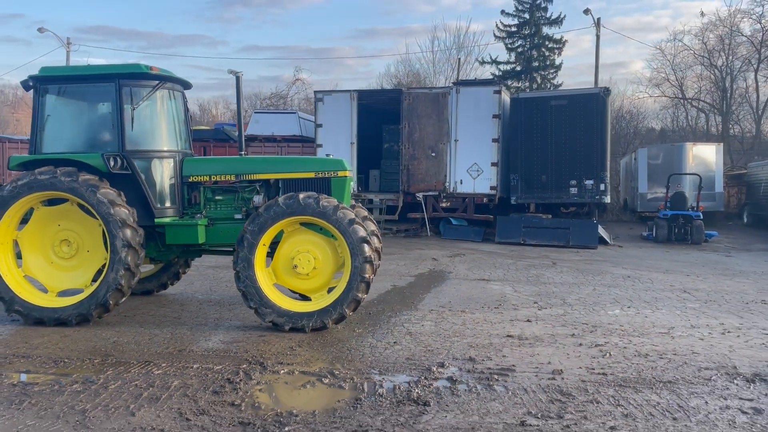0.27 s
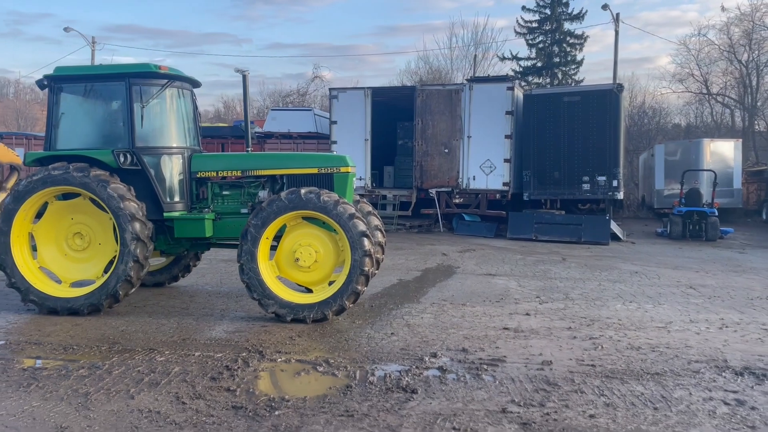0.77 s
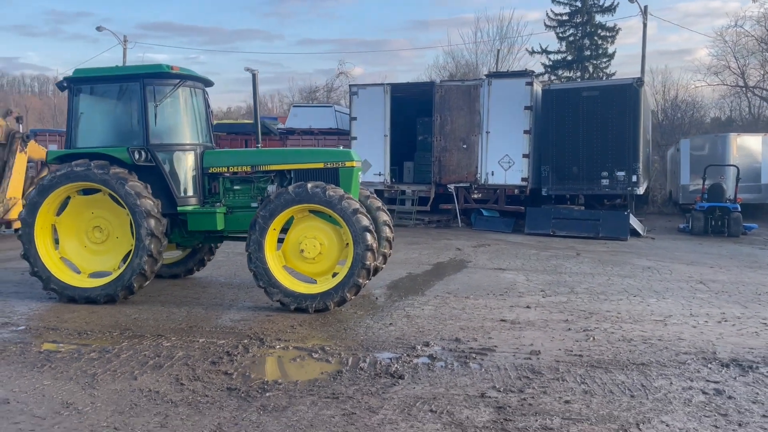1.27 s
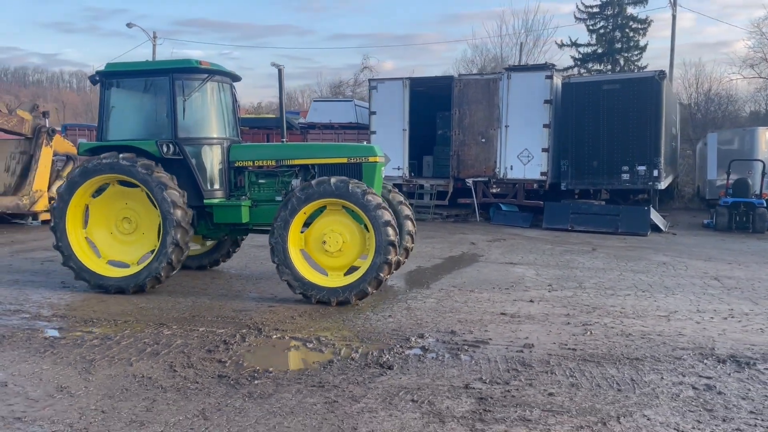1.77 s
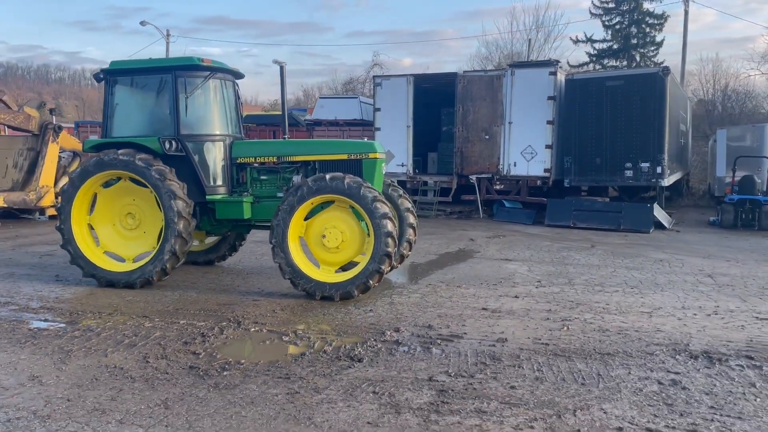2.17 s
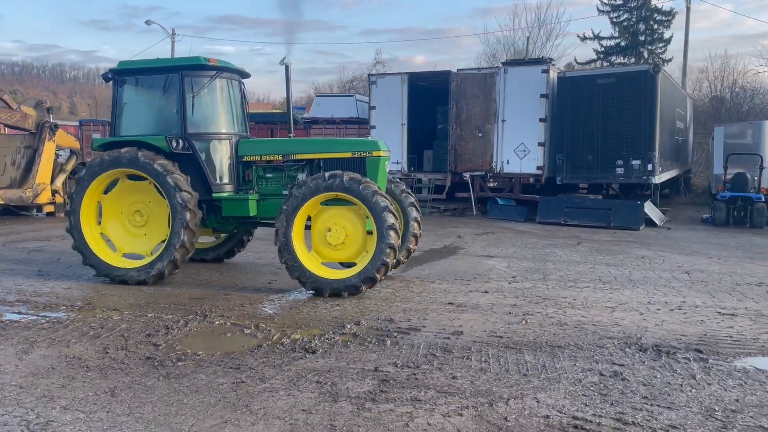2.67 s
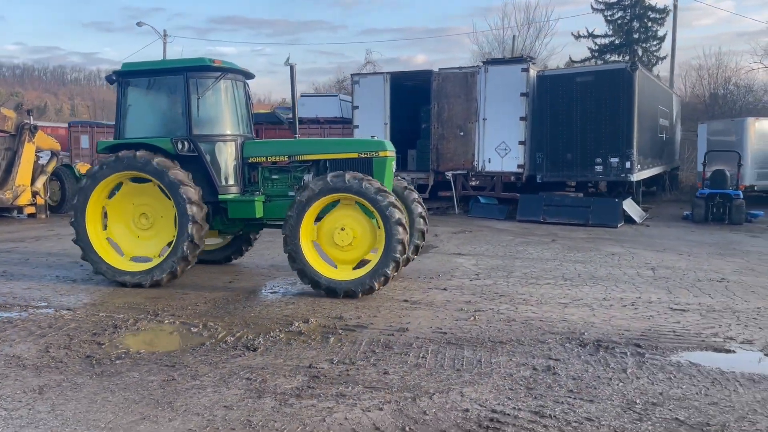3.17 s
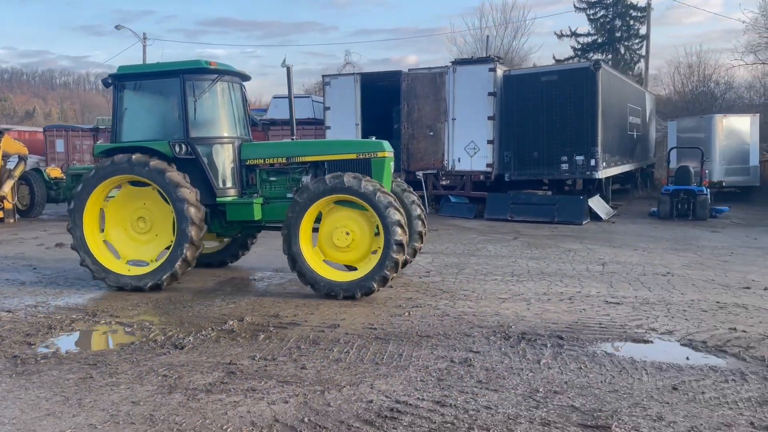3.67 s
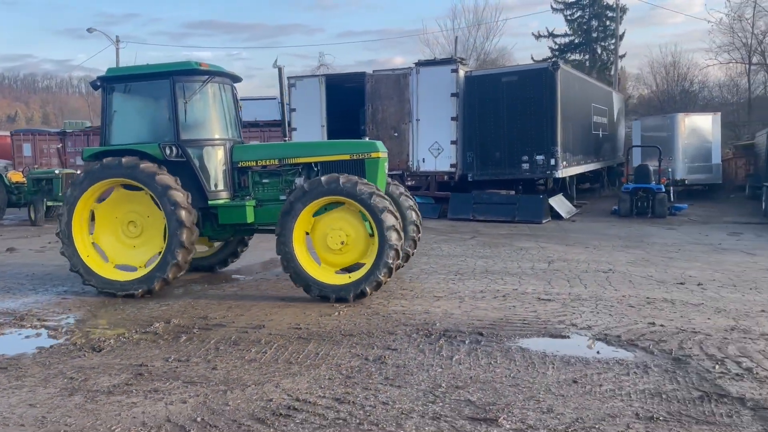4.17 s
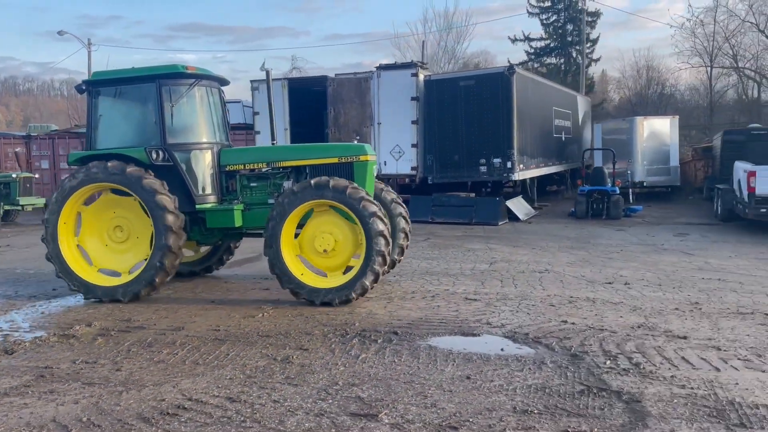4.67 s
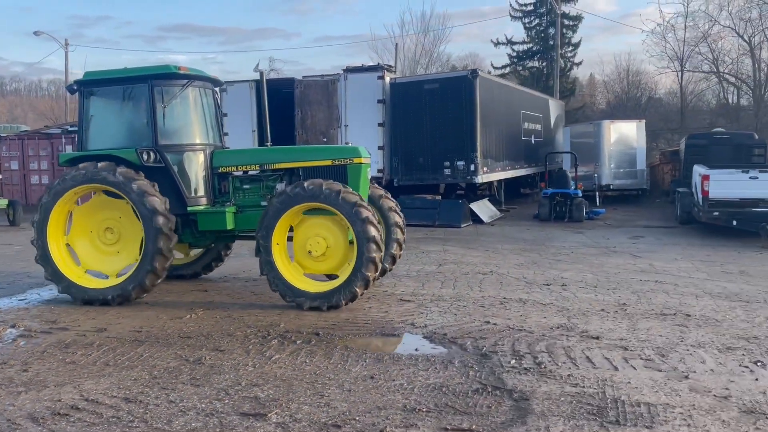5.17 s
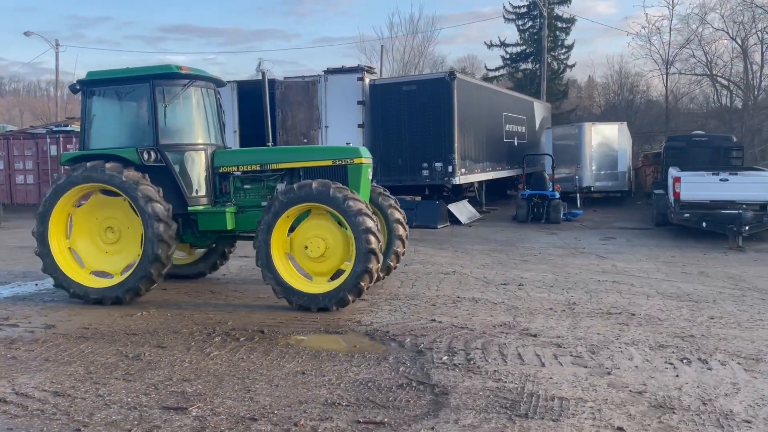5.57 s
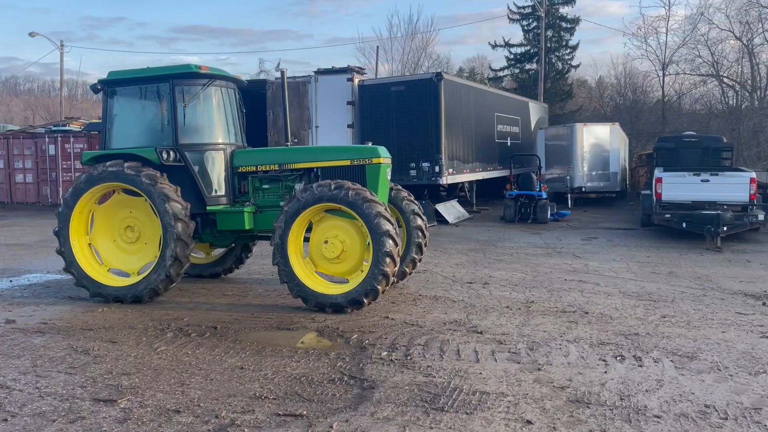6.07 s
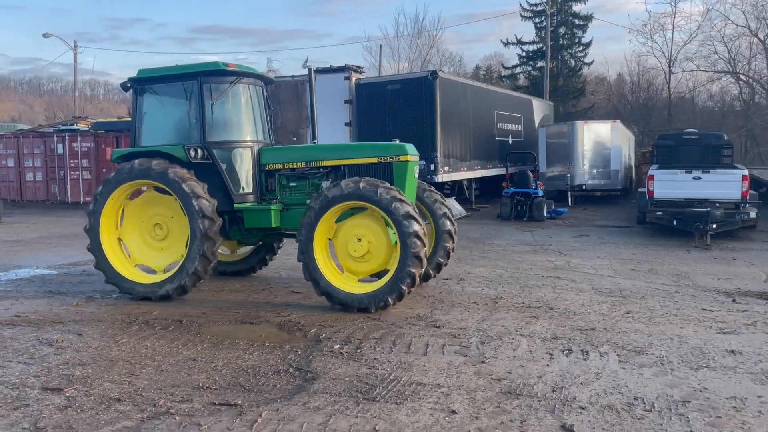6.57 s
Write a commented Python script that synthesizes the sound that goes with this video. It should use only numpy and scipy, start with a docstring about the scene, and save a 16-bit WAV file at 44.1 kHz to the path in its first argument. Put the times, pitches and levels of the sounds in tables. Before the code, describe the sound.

A large diesel tractor idles with clattering knock outdoors, a dull clunk and latch snap, then it revs to a loud steady roar.

```python
"""A six-cylinder diesel tractor idles in an open yard, then is revved up and held at full speed.
Exhaust orders are sines on the four-stroke cycle; knock, thuds and valve-gear clatter are contacts ringing resonances.
Shaped noise gives sump rumble and an injector hiss that pulses with the cycle; a drone catches up late.
A drive engages with a clunk and bouncing latch clacks: decaying modes.
A hand-held pair of microphone ports moves round the machine: phase lead and colour change with bearing."""
import sys
import numpy as np
from scipy import signal
from scipy.fft import rfft, irfft, next_fast_len
from scipy.io import wavfile
from scipy.ndimage import uniform_filter1d

SR = 44100
rng = np.random.default_rng(int(sys.argv[2]) if len(sys.argv) > 2 else 0)


def gain_from_db(level_db):
    """Turn a decibel level (scalar or array-like) into a linear amplitude factor."""
    decades = np.asarray(level_db, float) / 20
    return 10 ** decades


def materialize(psi):
    """Save the field psi as 16-bit PCM at rate SR to the path in sys.argv[1].

    A 1-D psi becomes a single channel; in a 2-D psi each row is a channel.
    """
    bounded = np.clip(np.atleast_2d(psi).T, -1, 1)
    quanta = np.round(bounded * 32767).astype(np.int16)
    wavfile.write(sys.argv[1], SR, quanta)


N = 301644
T = np.arange(N) / SR

# Cylinders in firing order, relative levels: (idle knock [dB], idle knock at later bearing [dB],
# knock at speed [dB], block thud [dB], injector tick [dB])
CYLINDER_LEVELS = [(-16, -9, -7, -8, -3), (-14, -7, -9, 0, -6), (0, -5, -2.5, -5, -2), (-7, -8, -9, -4, 0),
                   (-9, -3, -3, -9, -4), (-13, -4, -9, -8, 0)]
# Place in the cycle: (time [s], third cylinder's knock [cycle turns], fourth cylinder's tick [cycle turns])
EVENT_LAG = [(0, 0.33, 0.45), (1.2, 0.32, 0.45), (2.2, 0.37, 0.85), (2.9, 0.5, 0.26), (3.6, .47, 0.432),
             (6.84, 0.48, 0.27)]


def unit(x):
    """Scales to rms 1."""
    return x / np.sqrt(np.mean(x ** 2) + 1e-20)


def evened(x):
    """Evens loudness over a third of a second."""
    return x / np.sqrt(uniform_filter1d(x ** 2, SR // 3) + 1e-20)


def in_time(rows):
    """Columns of a table as curves over time."""
    s, *columns = np.transpose(rows)
    return [np.interp(T, s, c) for c in columns]


def at_hz(points, hz):
    """A spectrum table read on a log axis."""
    table_hz, table_db = np.array(points)[:, :2].T
    return np.interp(np.log(hz + 1), np.log(table_hz + 1), table_db)


def drift(rate_hz):
    """Slow random curve, rms 1, with two new values per 1/rate_hz."""
    steps = np.arange(0, T[-1] + 1, .5 / rate_hz)
    return unit(np.interp(T, steps, rng.standard_normal(len(steps))))


def noise(colour):
    """Noise of a given spectrum, rms 1."""
    spectrum = rfft(rng.standard_normal(N))
    return unit(irfft(spectrum * gain_from_db(at_hz(colour, np.fft.rfftfreq(N, 1 / SR))), N))


def resonance(x, hz, width_hz):
    """Two-pole resonance with zeros at DC and Nyquist."""
    r = np.exp(-np.pi * width_hz / SR)
    return signal.lfilter([1 - r, 0, r - 1], [1, -2 * r * np.cos(2 * np.pi * hz / SR), r * r], x)


def body(x, modes, view):
    """Parallel resonances, signs alternating; view moves through their level columns."""
    out = 0
    for k, (hz, width_hz, *levels_db) in enumerate(modes):
        share = gain_from_db(np.interp(view, range(len(levels_db)), levels_db))
        out = out + (-1) ** k * share * resonance(x, hz, width_hz)
    return evened(out)


def crank_rpm():
    """Crank speed: idle, a dip, then the climb to full speed."""
    rpm_curve = [(0.0, 711), (0.75, 721), (1.0, 717), (1.3, 667), (1.6, 653), (1.95, 670), (2.1, 670),
                 (2.2, 720), (2.3, 847), (2.4, 1060), (2.7, 1533), (3.0, 1846), (3.4, 2021), (3.8, 2112),
                 (4.28, 2132), (5.4, 2148), (5.96, 2151), (6.24, 2139), (6.8, 2110)]  # (time [s], crank speed [rpm])
    return in_time(rpm_curve)[0]


def stage():
    """Running state that selects level columns."""
    stage_curve = [(0, 0), (2.2, 0), (2.8, .12), (3.0, .45), (3.4, 1), (4.0, 1), (4.8, 2), (6.84, 2)]  # (time [s], 0 idle / 1 speeding up / 2 full speed)
    return in_time(stage_curve)[0]


def speed():
    """0 idle to 1 speeding up and beyond."""
    return np.clip(stage(), 0, 1)


def settled():
    """0 until the climb is over, 1 at full speed."""
    return np.clip(stage() - 1, 0, 1)


def throttle():
    """Fuel feed, 0 idle to 1 open."""
    push_s, fuel_rise_s = 2.15, 0.23
    return np.clip((T - push_s) / fuel_rise_s, 0, 1)


def bearing():
    """Share of the later bearing in what the ports hear."""
    bearing_curve = [(1.2, 0), (1.7, 1)]  # (time [s], share of later bearing)
    return in_time(bearing_curve)[0]


def loudness():
    """Level of each engine part, before trim, from bearing, throttle, speed and settling."""
    # Sump rumble, block, knock, clatter, hiss: (idle [dB], change at later bearing [dB], open throttle [dB],
    # speed [dB per doubling], change once settled [dB])
    level_laws = [(-31, 1, 8, -3.5, -2), (-37, -6, 8, 4.5, -4), (-40.5, -3, 9.5, 4.5, -2),
                  (-37, 0.68, 3, 4, -0.6), (-50.5, 0, 3.5, 8.5, 0)]
    idle_rpm = 700
    doublings = np.log2(crank_rpm() / idle_rpm)
    return np.array(level_laws) @ np.array([np.ones(N), bearing(), throttle(), doublings, settled()])


def drone():
    """Blade-like tone of a fan or pump that lags behind the crank, with two overtones."""
    drone_curve = [(3.0, 92, -61), (3.4, 100.1, -44), (3.8, 106.8, -29), (4.2, 117.3, -33),
                   (4.5, 126.7, -32), (5.0, 134.1, -26.5), (5.5, 138.2, -27.5), (6.1, 138.2, -27),
                   (6.84, 137, -30)]  # (time [s], pitch [Hz], level before partial gains [dB])
    partials = [(1, 3), (2, -8), (4, -11)]  # (multiple, gain [dB])
    hz, level_db = in_time(drone_curve)
    turn = np.cumsum(hz) / SR
    tone = 0
    for multiple, db in partials:
        tone = tone + gain_from_db(db + 0.35 * drift(8.2)) * np.sin(2 * np.pi * round(multiple) * turn)
    return np.sqrt(2) * gain_from_db(level_db) * tone


def struck(blows, modes, crack_db, rise_cycles):
    """Each blow: a noise crack, and modes near its favoured pitch that swell briefly, then decay."""
    reach_oct, crack_decay_s = 0.18, .0011
    out, age = np.zeros(N), T[:SR // 5]
    for s, db, aim_hz in blows:
        bright = np.diff(uniform_filter1d(rng.standard_normal(len(age) + 2), size=4), 2)
        ring = gain_from_db(crack_db) * bright * np.exp(-age / crack_decay_s)
        for hz, mode_db, t60_s in modes:
            share = gain_from_db(mode_db) * np.exp(-.5 * (np.log2(hz / aim_hz) / reach_oct) ** 2)
            swell = np.minimum(age * hz / rise_cycles, 1) ** 2
            decay = gain_from_db(-60 * np.maximum(age - rise_cycles / hz, 0) / t60_s)
            ring += share * np.sin(2 * np.pi * hz * age) * swell * decay
        start = int(s * SR)
        out[start:start + len(age)] += gain_from_db(db) * ring
    return out


def drive_clunk():
    """The drive engages: dull blows ring the housing modes."""
    clunk_blows = [(1.201, -21, 600), (1.214, -21.5, 1300), (1.2175, -19, 300), (1.219, -10, 150),
                   (1.2255, -23, 160), (1.233, -19, 330), (1.236, -25, 700), (1.241, -16.5, 597),
                   (1.247, -11.5, 135), (1.261, -12, 126), (1.275, -28, 650), (1.283, -24, 95),
                   (1.298, -20, 600), (1.301, -11.5, 150), (1.325, -12, 123), (1.372, -30, 90),
                   (1.4362, -10, 476), (1.452, -20, 140)]  # (time [s], strength [dB], favoured pitch [Hz])
    housing_modes = [(90, -1, 0.18), (140, -5, 0.057), (194, -6, 0.027), (304, 3, 0.027), (490, -8, 0.01),
                     (686, 2.5, 0.027), (1310, 5, 0.041)]  # (pitch [Hz], gain [dB], t60 [s])
    return struck(clunk_blows, housing_modes, crack_db=-30, rise_cycles=0.36)


def latch_clacks():
    """A latch snaps, then again with a bounce: short modes after a bright crack."""
    clack_blows = [(1.4482, -11, 1050), (1.465, -15, 1200), (1.4678, -19, 1100)]  # (time [s], strength [dB], favoured pitch [Hz])
    latch_modes = [(814, 3, 0.0091), (1075, 6.5, 0.0068), (1200, -3, 0.0063)]  # (pitch [Hz], gain [dB], t60 [s])
    return struck(clack_blows, latch_modes, crack_db=-3, rise_cycles=2.15)


def exhaust(cycle):
    """Sines on the cycle rate, each wavering on its own; three strong orders follow their own curves."""
    # Both: (multiple of the two-turn cycle, idle [dB rms], speeding up [dB rms], full speed [dB rms])
    exhaust_orders = [(3, -70, -46, -36.5), (4, -77, -55, -45), (5, -77, -50, -49), (7, -70, -34, -38),
                      (8, -71, -46, -45), (9, -62, -35, -36), (10, -69, -38, -40), (11, -66, -38, -40),
                      (13, -64, -52, -54), (14, -60, -36, -33), (16, -61, -46, -43), (17, -57, -51, -56),
                      (18, -46, -44, -48), (19, -56, -59, -54), (20, -65, -53, -49), (21, -62, -53, -52),
                      (22, -61, -56, -48), (23, -63, -57, -47), (24, -60, -47, -42), (25, -64, -54, -46),
                      (26, -67, -49, -47), (27, -57, -48, -39), (28, -67, -47, -46), (29, -62, -45, -39),
                      (30, -60, -46, -45), (31, -72, -47, -39)]
    high_orders = [(57, -70, -50, -41), (68, -70, -50, -42), (69, -70, -48, -38), (75, -70, -47, -44)]
    firing_curve = [(2.15, -60), (2.26, -46), (2.36, -31.5), (3.0, -31.5), (3.2, -36.5), (3.4, -25.5),
                    (3.8, -26), (3.95, -36), (4.4, -35), (4.65, -26), (5.3, -24), (5.9, -28), (6.2, -30),
                    (6.5, -27), (6.84, -28)]  # order 6: (time [s], level [dB rms])
    # Order 12 barks as the fuel comes: (time [s], order 12 [dB rms], order 15 [dB rms])
    bark_curve = [(0, -43, -42), (2.1, -42, -40), (2.3, -32, -44), (2.42, -45, -48), (2.95, -45, -49),
                  (3.2, -34, -36), (3.9, -36, -38), (4.6, -42, -38), (6.84, -43, -37)]
    state = stage()
    own_db = dict(zip((6, 12, 15), in_time(firing_curve) + in_time(bark_curve)))
    late_state = np.minimum(state, 1) + np.interp(T, (4.42, 4.65), (0, 1))  # low orders reach full level late
    out = 0
    for order, *levels_db in exhaust_orders + high_orders + [(k, 0, 0, 0) for k in own_db]:
        now = late_state if order < 6 else state
        db = np.interp(now, range(3), levels_db) + own_db.get(order, 0)
        slow_db = 1.64 * (order not in own_db) * drift(2.7)
        quick_db = (0.67 + 3 * state * (state < 1)) * drift(14)
        out = out + gain_from_db(db + slow_db + quick_db) * np.sin(2 * np.pi * (order * cycle + rng.random()))
    return np.sqrt(2) * out


def rumble():
    """Sump rumble: low noise, rms 1 before its level curve."""
    rumble_colour = [(25, -37), (45, -22), (80, 12.5), (130, 2), (250, 3.5), (340, -1), (500, -36.5)]  # (frequency [Hz], relative density [dB per Hz])
    swell_curve = [(1.5, 6), (1.8, 5), (2.3, 0), (2.45, -2), (2.8, 5.5), (4.42, 1), (4.65, 1)]  # (time [s], offset from the loudness law [dB])
    return gain_from_db(in_time(swell_curve)[0]) * noise(rumble_colour)


def whistles():
    """Faint flickering whistles: noise in narrow resonances."""
    whistle_modes = [(11530, 540, -18), (12090, 640, -18), (13020, 260, -20)]  # (pitch [Hz], width [Hz], level relative to hiss [dB])
    out = 0
    for hz, width_hz, db in whistle_modes:
        out = out + gain_from_db(db + 2.6 * drift(50)) * unit(resonance(rng.standard_normal(N), hz, width_hz))
    return out


def injector_hiss(cycle):
    """Coloured noise that pulses with each injection, and spurts as the drive takes up."""
    # (frequency [Hz], first bearing [dB per Hz], later bearing [dB per Hz]), relative
    hiss_colours = np.array([(2690, 15.5, 3.5), (4200, 10, -2), (5200, 7, -8.5), (5780, 7, -22),
                             (7560, 9, -1), (7500, 20.5, -0.5), (11800, 1.5, -6), (11900, -4, -7.5),
                             (13700, -7, -9.5), (15700, -20, -12)])
    spurt_s, spurt_db, rise_s, fall_s = 1.255, 4, 0.019, 0.02
    turn = bearing() * np.pi / 2
    air = np.cos(turn) * noise(hiss_colours[:, [0, 1]]) + np.sin(turn) * noise(hiss_colours[:, [0, 2]])
    air = air + whistles()
    tick = gain_from_db(np.transpose(CYLINDER_LEVELS)[4])
    place = (cycle - in_time(EVENT_LAG)[1] + 3 / 6) * 6 % 6
    since = place % 1  # in firing intervals
    puff = tick[place.astype(int) % 6] ** 0.96 * since / 0.2 * np.exp(-since / 0.15)
    puff = uniform_filter1d(puff * gain_from_db(0.23 * drift(23)), size=200) * gain_from_db(19.0 - 9.4 * speed())
    age = np.maximum(T - spurt_s, 0)
    spurt = np.minimum(age / rise_s, 1) * np.exp(-np.maximum(age - rise_s, 0) / fall_s)
    flicker_db = .3 * drift(20) + 1.3 * drift(70)
    return unit(.9 + puff) * air * gain_from_db(flicker_db + spurt_db * spurt)


def looped(cycle, places, sizes, loose_db, wobble, soft=20):
    """Contacts at fixed places in the cycle, a little different each time; soft is the blow width [samples]."""
    turns = np.arange(-1, int(cycle[-1]) + 2)[:, None]
    when = turns + places + wobble * rng.standard_normal((len(turns), len(places)))
    force = sizes * gain_from_db(loose_db * rng.standard_normal(when.shape))
    inside = (when > cycle[0]) & (when < cycle[-1])
    clicks = np.bincount(np.searchsorted(cycle, when[inside]), force[inside], N) + 1e-18
    return np.convolve(clicks, np.hanning(soft), "same") / (soft / 2)


def gear(cycle, count, loose_db):
    """Valves, pump and gears: many small contacts that come back each cycle."""
    sizes = rng.choice([-1, 1], count) * gain_from_db(rng.normal(0, 3.7, count))
    return looped(cycle, rng.random(count), sizes, loose_db, wobble=0.00048, soft=8.5)


def rattles(pace):
    """Loose parts tick at random, a few strongly; pace multiplies the rate."""
    base_rate_hz, spread_db = 260, 4
    sizes = gain_from_db(spread_db * np.minimum(rng.exponential(1, N), 4)) * rng.choice([-1, 1], N)
    return np.convolve(sizes * (rng.random(N) < base_rate_hz * pace / SR), np.hanning(8), "same") / 4


def clatter(cycle, blows):
    """Valve-gear contacts, loose ticks, blows and noise that flares with each firing ring bright modes."""
    # (pitch [Hz], width [Hz], idle first bearing [dB], idle later bearing [dB], speed [dB])
    clatter_modes = [(1690, 257, 2, 0, 2.5), (2170, 295, 4.5, 5.5, 0.5), (2666, 896, 3, 1.5, -4),
                     (3525, 1060, 0.5, -0.5, -7.5), (4480, 860, -7, -8.5, -17.5), (2280, 54, 10.5, -7, -7),
                     (3074, 55, 0, 2, -15), (1710, 120, -20, -25, -22.5), (1540, 400, -7, -5.5, -21)]
    walk_curve = [(.2, 0), (1.4, 1)]  # (time [s], share of later bearing for the valve gear)
    decay_s, steady = .005, .3
    trail = signal.lfilter([1], [1, -np.exp(-1 / (decay_s * SR))], np.abs(blows))
    flare = unit(steady + trail)
    contacts = (gain_from_db(-1.5) * gear(cycle, count=60, loose_db=0.5)
                + gain_from_db(-7.5) * rattles(1 + 2 * speed())
                + gain_from_db(8.5) * bearing() * blows
                + gain_from_db(-22.0) * flare * rng.standard_normal(N))
    return body(contacts, clatter_modes, in_time(walk_curve)[0] + np.maximum(speed(), 0.69 * throttle()))


def block(cycle):
    """Cylinder thuds, gear contacts and noise ring the block; neighbouring cylinders push opposite ways."""
    block_modes = [(300, 350, -17, -21), (467, 98, -1, -6), (556.4, 79, -1, -1), (740, 283, -6, -6)]  # (pitch [Hz], width [Hz], idle [dB], speed [dB])
    second_thud_turns = .82
    push = (-1) ** np.arange(6)
    sizes = gain_from_db(np.transpose(CYLINDER_LEVELS)[3]) * push
    thuds = looped(cycle - second_thud_turns + 1 / 6, np.arange(6) / 6, sizes, 0.69, 0.0016)
    contacts = (gain_from_db(-13.0 + 14.0 * speed()) * thuds
                + gain_from_db(-5.0) * gear(cycle, count=20, loose_db=1.5)
                + gain_from_db(-25.0 - 2.4 * speed()) * rng.standard_normal(N))
    return body(contacts, block_modes, speed())


def combustion_blows(cycle):
    """One blow per firing, with cylinder levels set by bearing and speed."""
    idle, later, fast = gain_from_db(np.transpose(CYLINDER_LEVELS)[:3])
    fired = cycle - in_time(EVENT_LAG)[0] + 2 / 6
    six, push = np.arange(6) / 6, (-1) ** np.arange(6)
    slow = ((1 - bearing()) * looped(fired, six, idle, 1.8, .002)
            + bearing() * looped(fired, six, later, 3.5, .006))
    return (1 - speed()) * slow + speed() * looped(fired, six, fast * push, 2.5, .002)


def knock(cycle, blows):
    """Blows, gear and noise ring modes that swell and die softly: three one-pole stages on a drifting pitch."""
    # (pitch before bend [Hz], pole width [Hz], idle first bearing [dB], idle later bearing [dB],
    # speeding up [dB], full speed [dB])
    knock_modes = [(1034, 300, -24, -18, -2, -3), (1265, 180, 0, 0, 1, 0), (1464, 280, -24, -8, -2, -2),
                   (1235, 90, -25, -18, -12, -2)]
    bend_curve = [(0, 1.0), (.8, 1.02), (1.3, 1.045), (2.1, 1.05), (2.4, 1.0), (6.84, .99)]  # pitch drifts with bearing: (time [s], ratio)
    rattle = (gain_from_db(-29 + 11 * speed()) * gear(cycle, count=30, loose_db=3)
              + gain_from_db(-42 + 6 * bearing() + 1.5 * throttle()) * rng.standard_normal(N))
    contacts = blows + rattle
    view = bearing() + throttle() + settled()
    turn = np.cumsum(in_time(bend_curve)[0]) / SR
    out = 0
    for k, (hz, width_hz, *levels_db) in enumerate(knock_modes):
        r, spin = np.exp(-np.pi * width_hz / SR), np.exp(2j * np.pi * hz * turn)
        envelope = signal.lfilter([(1 - r) ** 3], np.poly([r, r, r]), contacts / spin)
        share = gain_from_db(np.interp(view, range(len(levels_db)), levels_db))
        out = out + (-1) ** k * share * np.real(spin * envelope)
    waver_db = (-0.03 + 1.93 * throttle() - 1.2 * speed()) * drift(16)
    return evened(out) * gain_from_db(waver_db)


def engine(cycle):
    """Sump rumble, hiss, clatter, block and combustion knock at their running levels."""
    rumble_db, block_db, knock_db, clatter_db, hiss_db = loudness()
    blows = combustion_blows(cycle)
    return (gain_from_db(rumble_db - 12.5) * rumble()
            + gain_from_db(hiss_db + 9.0) * injector_hiss(cycle)
            + gain_from_db(clatter_db + 1.0) * clatter(cycle, blows)
            + gain_from_db(block_db + 0.5) * block(cycle)
            + gain_from_db(knock_db + 2.5) * knock(cycle, blows))


def ports(x, wet_db):
    """Two ports hear the source with a phase lead that depends on bearing, plus a diffuse part each."""
    # Both: (frequency [Hz], left lead [rad])
    lead_first = [(40, .35), (350, .2), (1050, 1.7), (1400, 1.6), (2070, 6.1), (2750, 7.4), (3600, 8),
                  (4500, 6), (5700, 4.7), (6500, 5.3), (7600, 3.6), (8300, 3.14), (8800, 3.05),
                  (10000, 2.2), (11700, 1.2), (13400, 0)]
    lead_later = [(40, -.4), (250, -.4), (520, .2), (900, 1.1), (1250, 1), (1550, .5), (2240, .7),
                  (3000, 1.6), (4500, 1.4), (5340, 2.7), (6400, 5.2), (7060, 4.1), (7750, 3.16),
                  (8900, 3.12), (9800, 2.3), (11200, 1.5), (13300, 0)]
    side_tilt = [(200, 0), (380, -1.5), (700, -3.5), (1290, 2.5), (2380, 1.5), (4400, 3), (6000, 0),
                 (7000, 1), (7700, 0)]  # (frequency [Hz], left minus right [dB])
    # Diffuse part, differing between the ports: (frequency [Hz], level before wet_db [dB])
    diffuse_colour = [(100, -28), (300, -18), (600, -9), (1500, -9), (3500, -4), (5500, 3), (7200, -4),
                      (7800, -26), (8900, -28), (9600, -6), (12600, -6), (13500, -26)]
    diffuse_decay_s, shift_hz = .03, .35
    size = next_fast_len(N + SR // 4)
    hz, spectrum = np.fft.rfftfreq(size, 1 / SR), rfft(x, size)
    sides = np.array([[.5], [-.5]])
    tilted = spectrum * gain_from_db(sides * at_hz(side_tilt, hz))

    def heard(lead):
        """Advances the left port's phase."""
        lead_rad = np.interp(hz, *np.transpose(lead))
        return irfft(tilted * np.exp(1j * (sides + .5) * lead_rad), size)[:, :N]

    tail = rng.standard_normal((2, 2, SR // 5)) * np.exp(-T[:SR // 5] / diffuse_decay_s)
    tail = tail / np.linalg.norm(tail, axis=2, keepdims=True)
    diffuse = rfft(tail, size) * gain_from_db(at_hz(diffuse_colour, hz) + wet_db)
    here, there = irfft(spectrum * diffuse, size)[..., :N]
    walk = 2 * np.pi * shift_hz * T  # the diffuse pattern shifts between two sets
    direct = (1 - bearing()) * heard(lead_first) + bearing() * heard(lead_later)
    return direct + np.cos(walk) * here + np.sin(walk) * there


def scene():
    """Drone, exhaust and engine at the two ports, with drier bumps."""
    cycle = np.cumsum(crank_rpm() / 120) / SR  # a four-stroke cycle is two crank turns
    machine = drone() + exhaust(cycle) + engine(cycle)
    bumps = drive_clunk() + latch_clacks()
    return ports(bumps, wet_db=-8) + ports(machine, wet_db=0)


def band_limit(x):
    """A steep low-pass at the top of the band."""
    return signal.sosfilt(signal.butter(12, 15870, fs=SR, output="sos"), x)


def record(dry):
    """The microphone loses the deepest bass; the top is cut steeply."""
    bass_cut_hz, top_cut_hz = 38.3, 15850
    mix = signal.sosfilt(signal.butter(2, bass_cut_hz, "high", fs=SR, output="sos"), dry)
    mix = signal.sosfilt(signal.cheby2(16, 70, top_cut_hz, fs=SR, output="sos"), mix)
    return band_limit(mix)


dry = scene()
out = record(dry)
materialize(out)
```